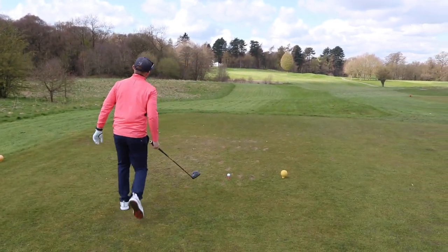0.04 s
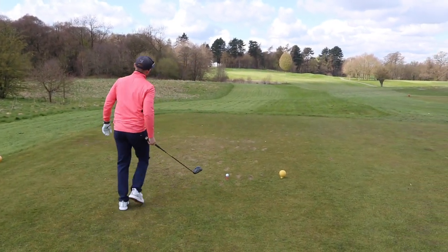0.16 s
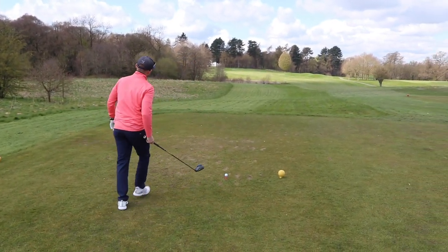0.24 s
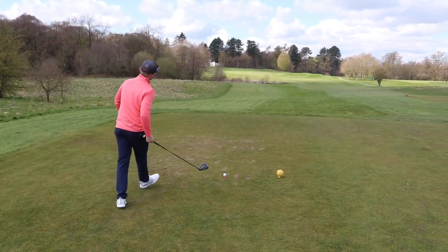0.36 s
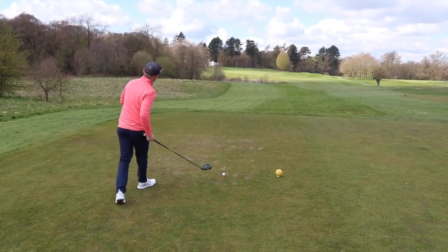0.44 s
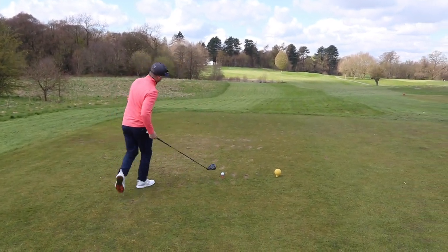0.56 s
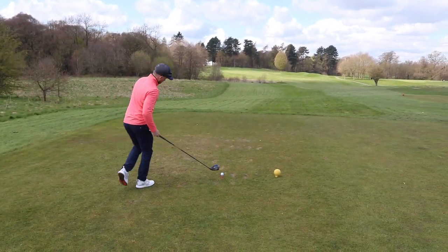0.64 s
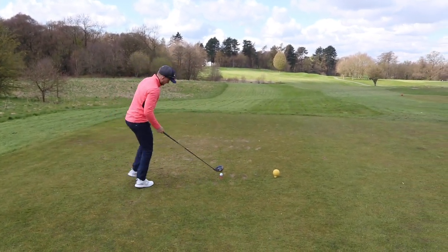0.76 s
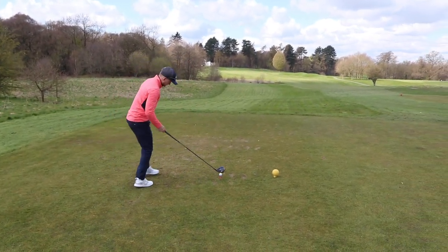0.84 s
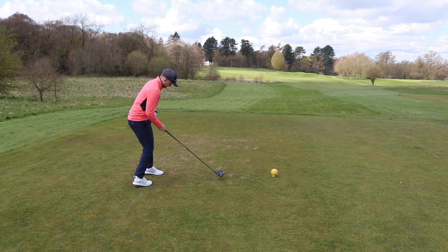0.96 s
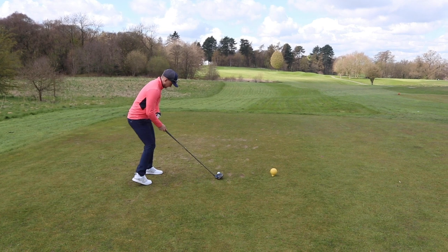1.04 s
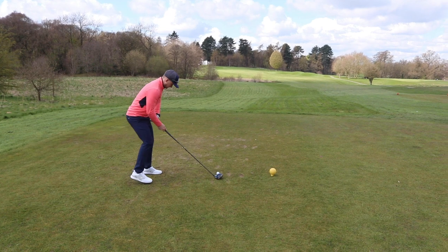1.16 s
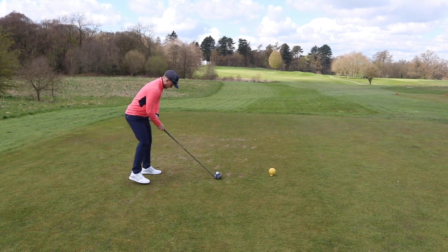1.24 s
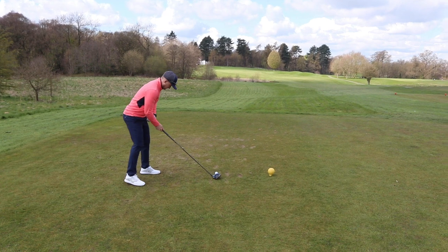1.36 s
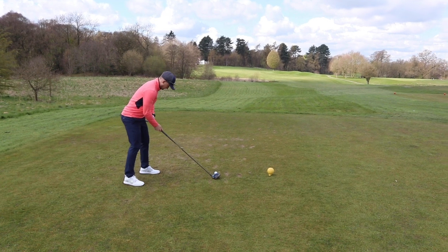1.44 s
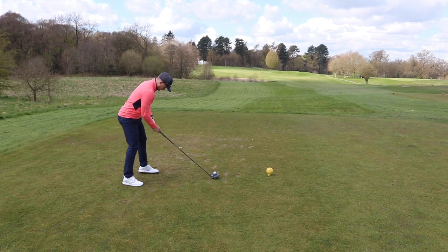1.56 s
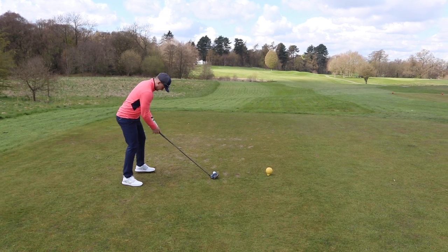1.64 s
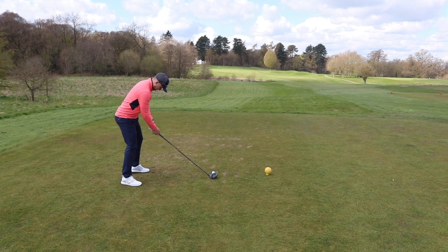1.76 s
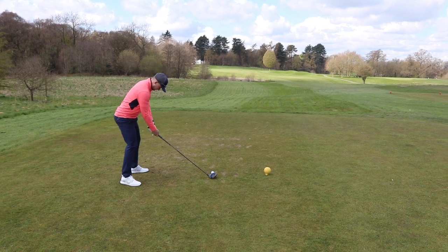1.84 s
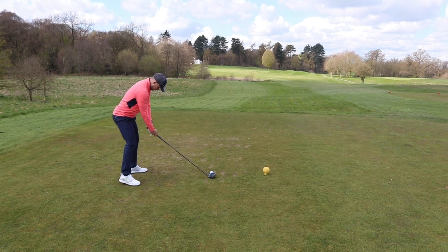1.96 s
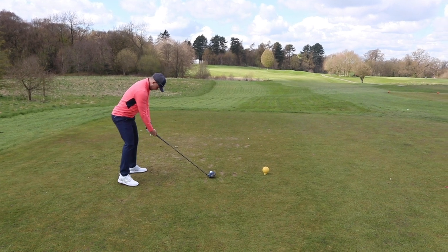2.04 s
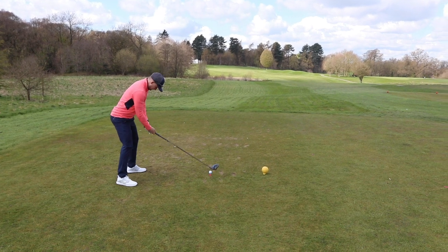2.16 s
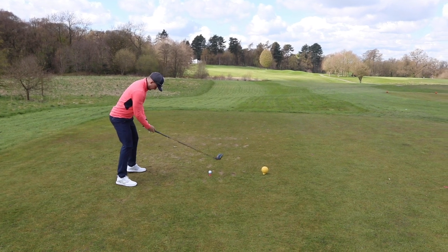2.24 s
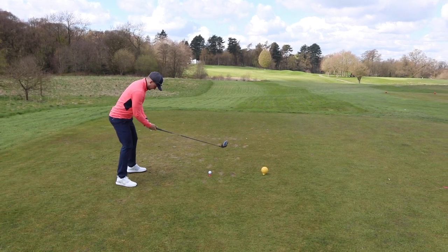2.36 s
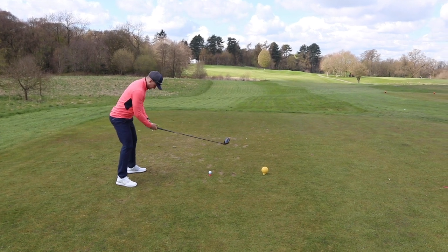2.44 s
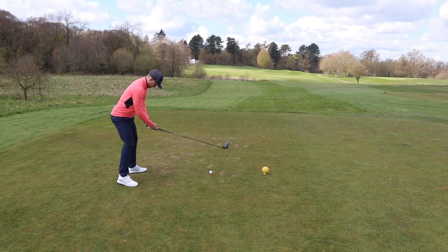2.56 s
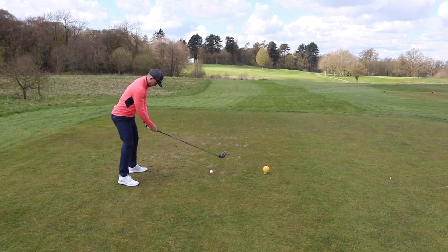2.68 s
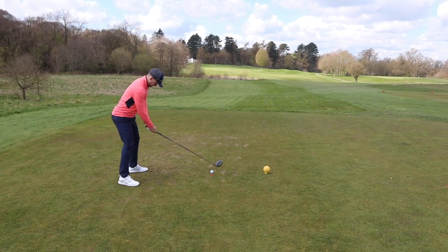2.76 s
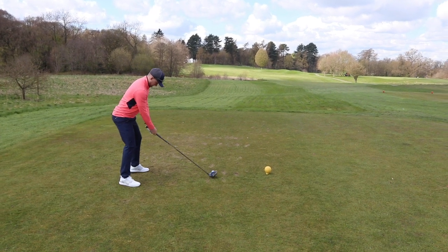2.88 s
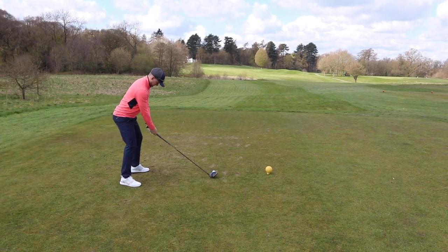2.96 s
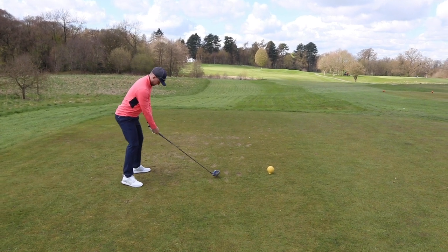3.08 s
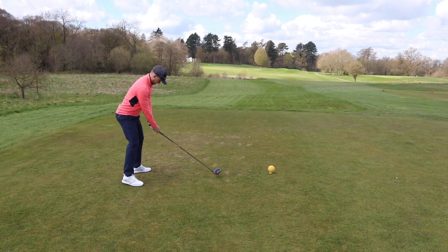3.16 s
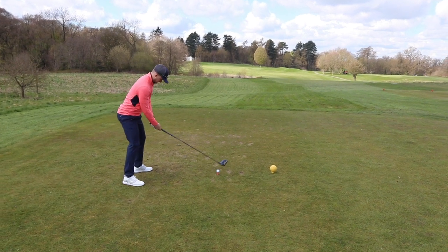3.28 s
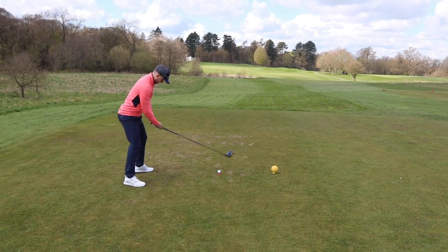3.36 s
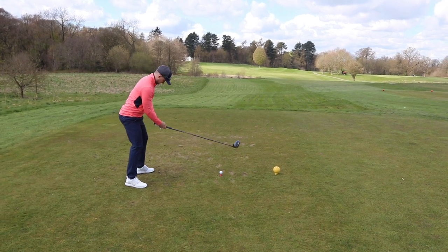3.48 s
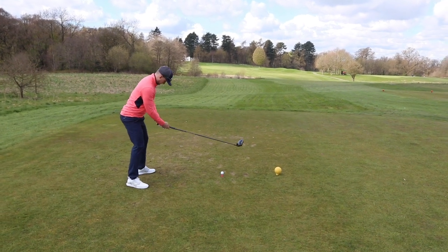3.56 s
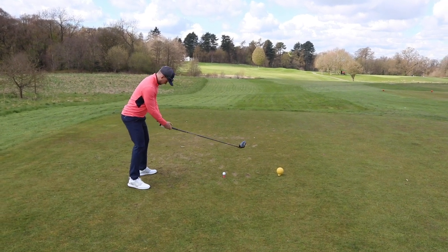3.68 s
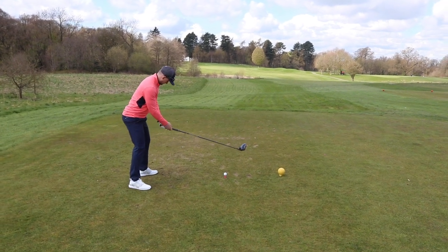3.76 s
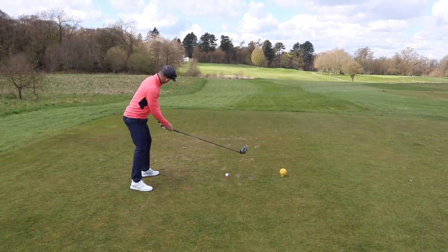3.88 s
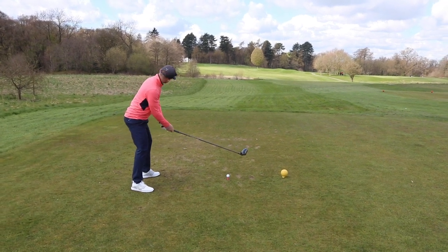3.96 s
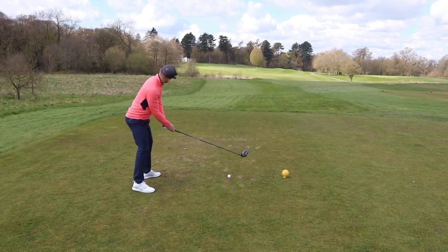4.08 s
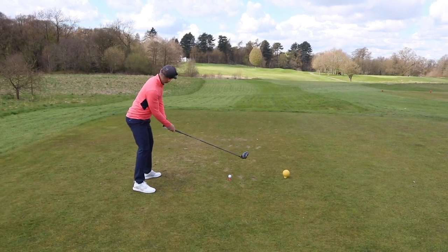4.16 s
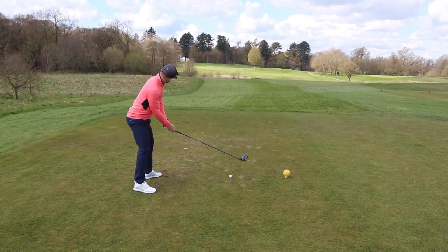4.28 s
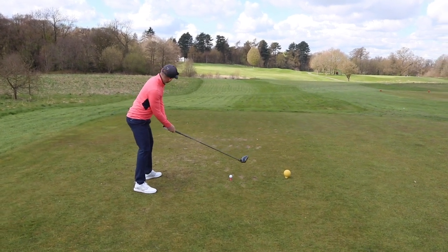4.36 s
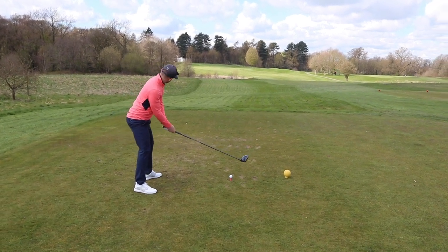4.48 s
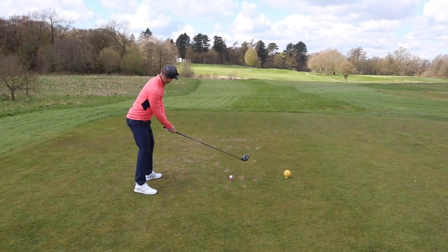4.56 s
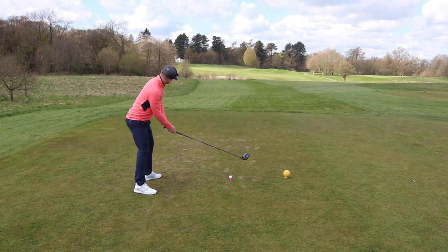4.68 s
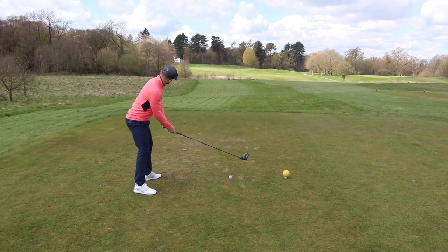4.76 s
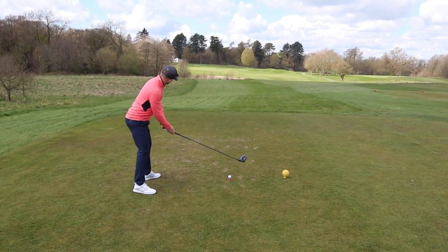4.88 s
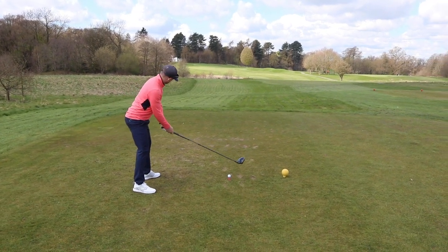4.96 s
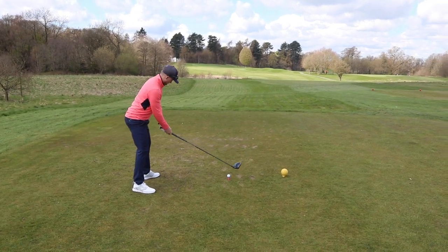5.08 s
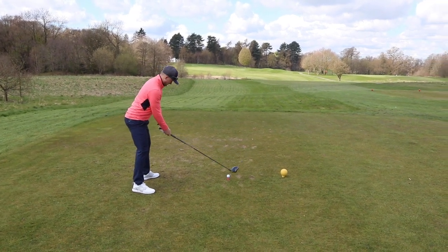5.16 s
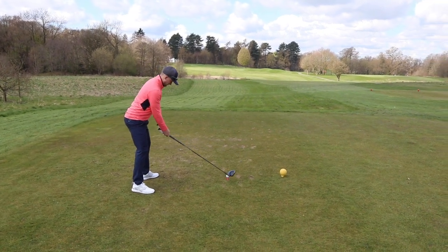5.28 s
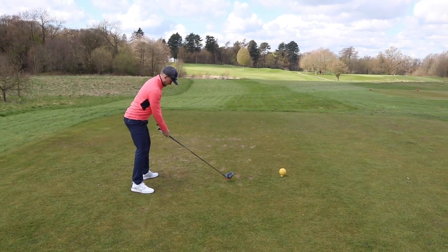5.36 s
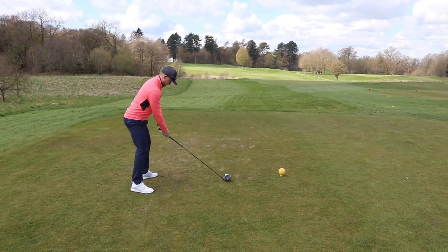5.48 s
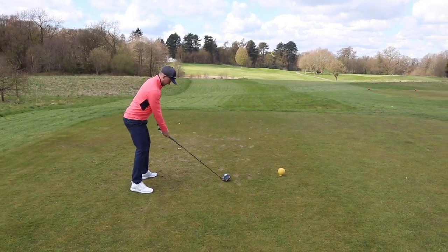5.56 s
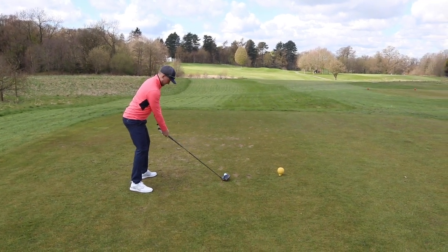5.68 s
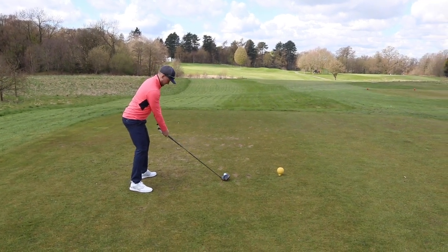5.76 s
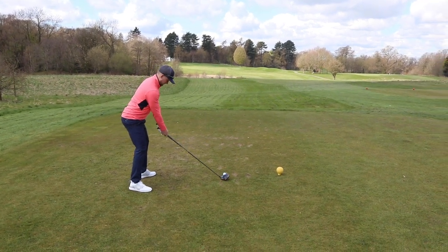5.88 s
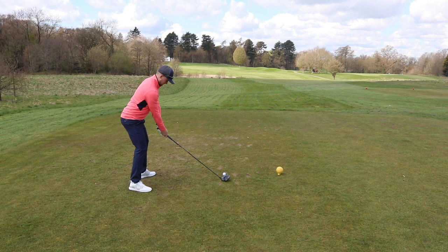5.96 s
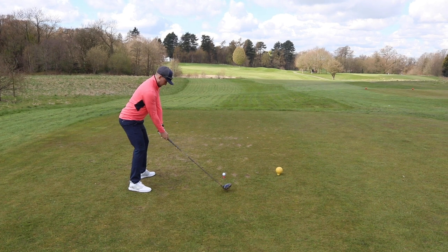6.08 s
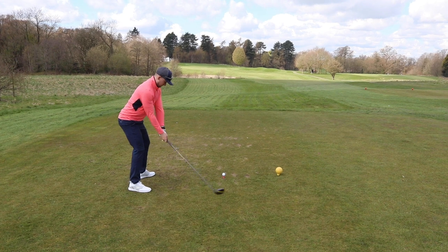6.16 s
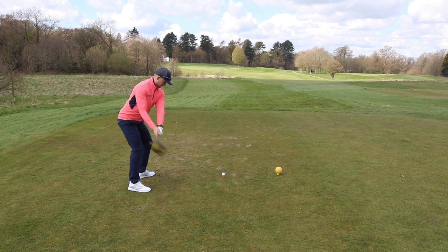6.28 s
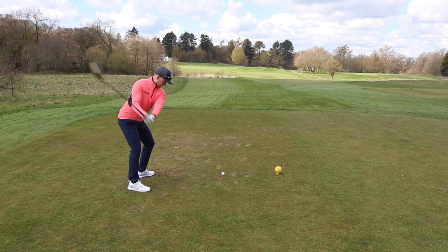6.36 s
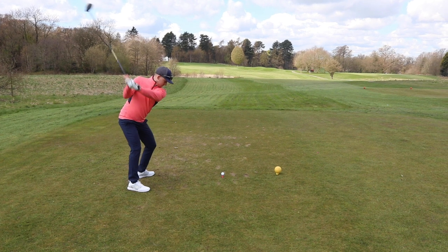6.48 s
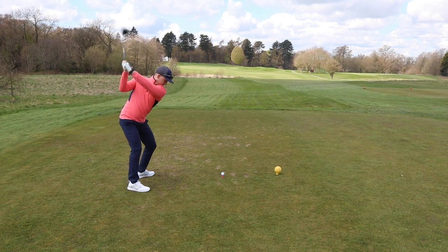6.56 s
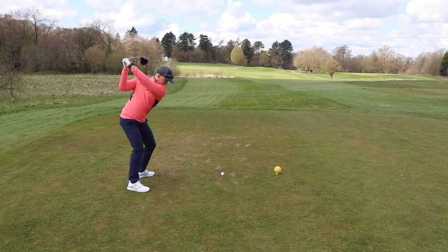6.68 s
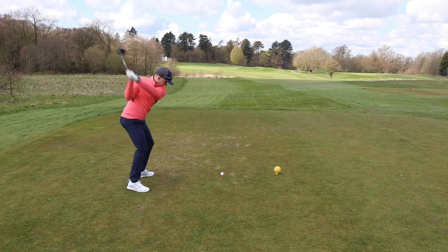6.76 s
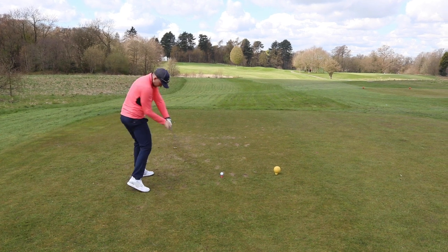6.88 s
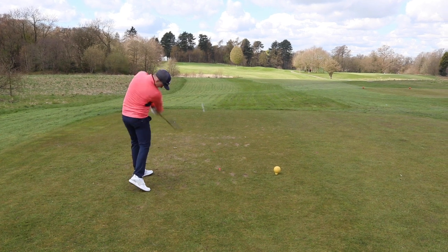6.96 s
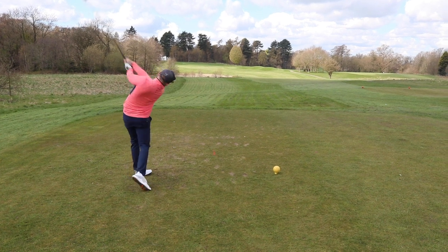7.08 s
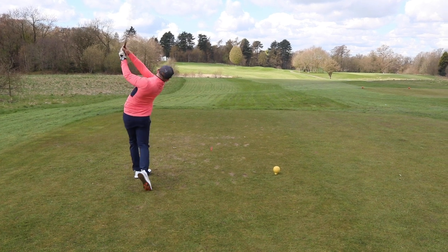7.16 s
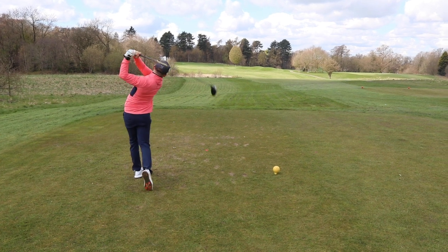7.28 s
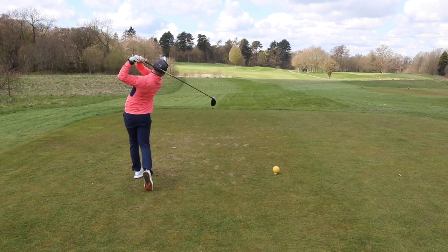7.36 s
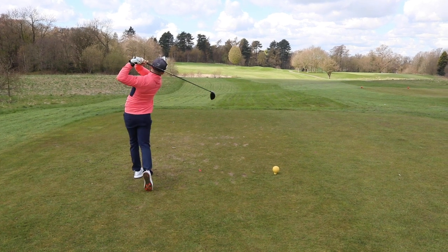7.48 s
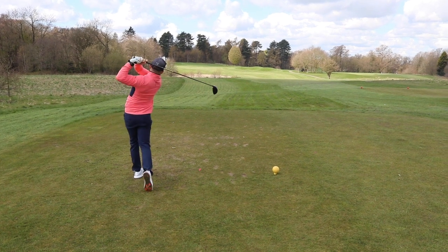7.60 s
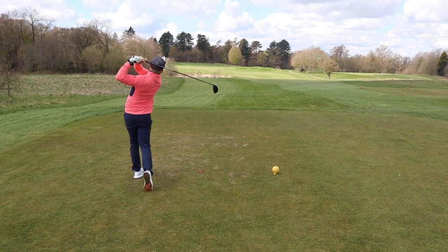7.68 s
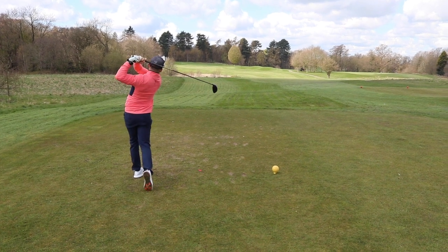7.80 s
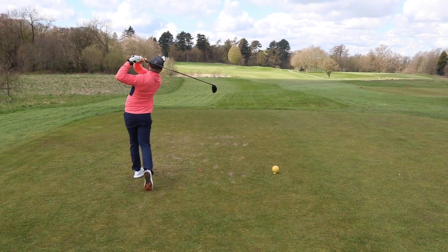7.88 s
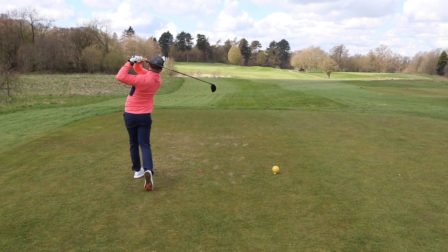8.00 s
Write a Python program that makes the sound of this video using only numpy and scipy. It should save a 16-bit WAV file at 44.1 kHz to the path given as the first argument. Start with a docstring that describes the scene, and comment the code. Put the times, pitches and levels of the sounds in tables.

```python
"""Golf drive outdoors. Throughout: far traffic rumble, tyre roar, leaves and faint drones, all from shaped noise.
From 1.9 s the player's glove and jacket creak (slips exciting resonances); from 3.8 s a far small bird sings
(sine sweeps). Near 7 s the shaft whooshes down (noise and whistle following its speed), then the hollow metal
head cracks and rings, its pitch rising as it swings round; ground and trees answer with decaying noise bursts.
Preamp hiss lies under it all; gain control ducks the blow and the microphone clips."""
import sys
import numpy as np
from scipy import signal
from scipy.fft import rfft, irfft, next_fast_len
from scipy.io import wavfile
from scipy.ndimage import minimum_filter1d, map_coordinates

SR = 44100
rng = np.random.default_rng(int(sys.argv[2]) if len(sys.argv) > 2 else 0)


def pcm_store(signal):
    """Save signal as 16-bit PCM."""
    levels = np.round(np.clip(np.atleast_2d(signal), -1, 1) * 32767)
    wavfile.write(sys.argv[1], SR, levels.astype(np.int16).T)


def volts_from_decibels(level):
    """Turn decibel levels (scalar or array-like) into linear amplitude factors."""
    exponent = np.asarray(level, float) / 20
    return 10 ** exponent


N = 354211
T = np.arange(N) / SR
BLOW_S = 7.0681


def unit(x):
    """Scaled to rms 1."""
    return x / np.sqrt(np.mean(x ** 2) + 1e-20)


def curves(rows):
    """One value per sample for each column after the time."""
    time_s, *columns = np.transpose(rows)
    return [np.interp(T, time_s, column) for column in columns]


def wobble(rate_hz):
    """Smooth random curve, rate_hz knots a second."""
    knots = rng.standard_normal(int(N * rate_hz / SR) + 4)
    return map_coordinates(knots, [T * rate_hz])


def filtered(x, response):
    """x times a complex response of frequency."""
    size = next_fast_len(len(x) + 8192)
    hz = np.fft.rfftfreq(size, 1 / SR)
    return irfft(rfft(x, size) * response(hz), size)[:len(x)]


def noise(spectrum, size=N):
    """Noise of rms 1, spectrum interpolated over log frequency."""
    point_hz, point_db = np.transpose(spectrum)

    def response(hz):
        return volts_from_decibels(np.interp(np.log(hz + 1), np.log(point_hz + 1), point_db))

    return unit(filtered(rng.standard_normal(size), response))


def resonance(hz, centre_hz, width_hz):
    """Causal second-order band-pass response."""
    return 1j * hz * width_hz / (centre_hz ** 2 - hz ** 2 + 1j * hz * width_hz)


def add(track, start_s, sound):
    """Mixes a sound into the track at start_s."""
    part = track[round(start_s * SR):][:len(sound)]
    part += sound[:len(part)]


# mean background levels: (time [s], rumble level [dB], tyre roar level [dB], leaves level [dB])
FAR_LEVELS = [(0.0, -34.5, -46, -63), (0.4, -31.5, -47, -63), (0.7, -35.5, -48.5, -65.5),
              (1.1, -32, -48, -65), (1.7, -33.5, -47, -65), (2.1, -35, -50, -65.5),
              (3.05, -37, -49.5, -64.5), (3.4, -33, -50, -63), (3.9, -32.5, -50, -63),
              (4.5, -34, -50.5, -65), (5.05, -36.5, -51, -64), (5.8, -32, -51.5, -67.5),
              (6.6, -33.5, -49, -63), (7.5, -33, -48.5, -65.5), (8.0, -34.5, -48, -66.5)]
# noise spectra: (frequency [Hz], density [dB])
RUMBLE_SPECTRUM = [(8.8, -43), (15, -13.5), (48, 2), (91, 2), (112, -3.5), (140, -1.5), (166, -6),
                   (237, -14.5), (277, -14.5), (450, -27.5), (580, -61.5), (990, -120)]
ROAR_SPECTRUM = [(180, -31), (300, -6.5), (481, -4.5), (567, -6), (667, -5.5), (728, -5), (786, -2.5),
                 (849, -6), (917, -3.5), (1540, -6.5), (1720, -9), (2340, -12.5), (3000, -32), (3900, -62),
                 (6600, -120)]
LEAVES_SPECTRUM = [(1530, -25.5), (2600, -1.5), (3250, -6.5), (4170, -7), (5230, -17.5), (6000, -21.5),
                   (7800, -45), (13200, -120)]
# steady narrow bands: (frequency [Hz], width [Hz], level [dB rms])
DRONE_BANDS = [(138.6, 9.7, -44.5), (809.7, 22, -62)]


def background():
    """Traffic rumble in lumps, tyre roar and leaves as wavering noise; drones as resonated noise."""
    rumble_db, roar_db, leaves_db = curves(FAR_LEVELS)
    rumble_db = rumble_db + 1.1 * wobble(7) + 0.83 * wobble(16)
    roar_db = roar_db + 0.77 * wobble(5)
    leaves_db = leaves_db + 0.8 * wobble(6)
    out = volts_from_decibels(rumble_db) * noise(RUMBLE_SPECTRUM)
    out += volts_from_decibels(roar_db) * noise(ROAR_SPECTRUM)
    out += volts_from_decibels(leaves_db) * noise(LEAVES_SPECTRUM)
    for centre_hz, width_hz, level_db in DRONE_BANDS:
        drone = filtered(rng.standard_normal(N), lambda hz: resonance(hz, centre_hz, width_hz) ** 2)
        out += volts_from_decibels(level_db) * unit(drone)
    return out


# single notes: (time [s], length [s], start pitch [Hz], end pitch [Hz], level [dB rms])
BIRD_NOTES = [(3.847, .1, 5250, 4700, -71), (4.04, .1, 6750, 6850, -83), (5.41, .09, 7000, 7080, -81)]
# see-saw song: a falling note follows each rising one
SONG_S, PAIR_S, ANSWER_S = 4.307, 0.1702, 0.08  # first note, pair spacing, rise-to-fall delay
RISING, FALLING = (0.032, 4900, 5700), (0.031, 6200, 4750)  # (length [s], start pitch [Hz], end pitch [Hz])
PAIR_DB, SCATTER_DB = (-75, -77, -73, -69.5, -72.5, -72), 0.8  # mean per pair, random spread per note


def bird():
    """Sine sweeps, quickest at the high end, fluttering in the moving air."""
    out = np.zeros(N)
    notes = list(BIRD_NOTES)
    for k, pair_db in enumerate(PAIR_DB):
        for j, shape in enumerate((RISING, FALLING)):
            level_db = pair_db + SCATTER_DB * rng.standard_normal()
            notes.append((SONG_S + PAIR_S * k + ANSWER_S * j, *shape, level_db))
    for start_s, length_s, start_hz, end_hz, level_db in notes:
        u = np.arange(int(length_s * SR)) / (length_s * SR)
        height = u if end_hz > start_hz else 1 - u
        pitch_hz = min(start_hz, end_hz) + abs(end_hz - start_hz) * height ** 1.5
        tone = np.sin(2 * np.pi * np.cumsum(pitch_hz) / SR)
        swell = np.sin(np.pi * u) ** 0.8 * (1 - 0.5 * height)
        flutter = volts_from_decibels(2.5 * wobble(150)[:len(u)])
        add(out, start_s, volts_from_decibels(level_db) * unit(swell * flutter * tone))
    return out


# leather resonances: (frequency [Hz], width [Hz], gain [dB])
LEATHER_MODES = [(1320, 120, 9), (1590, 110, 10), (2150, 200, 1), (2500, 220, 1), (2910, 240, -0.5),
                 (4000, 280, -1.5), (4400, 350, -2), (4780, 250, -1.5), (5430, 350, -8)]


def leather(hz, colour_hz, spread_oct):
    """Response of the leather modes, weighted towards colour_hz, signs alternating."""
    total = 0
    for k, (centre_hz, width_hz, gain_db) in enumerate(LEATHER_MODES):
        weight = np.exp(-(np.log2(centre_hz / colour_hz) / spread_oct) ** 2)
        total = total + (-1) ** k * volts_from_decibels(gain_db) * weight * resonance(hz, centre_hz, width_hz)
    return total


# glove and jacket: (time [s], level [dB], length [s], colour centre [Hz], colour spread [octaves])
CREAK_EVENTS = [(1.94, -50.5, 0.072, 1490, 0.22), (2.629, -55.5, .025, 2150, .15),
                (2.889, -50.5, 0.025, 2600, 1.4), (3.028, -50, 0.026, 1320, .15),
                (3.064, -52, .03, 2200, 0.83), (3.588, -49, 0.08, 1600, 0.22),
                (3.775, -55, 0.014, 3100, 0.53), (3.841, -51, 0.011, 2900, .5),
                (4.003, -58.5, 0.01, 3900, 0.95), (4.076, -57, .012, 3100, .35),
                (4.197, -59, .012, 3800, .7), (4.268, -64, .01, 4750, .3),
                (4.434, -51.5, 0.021, 2690, 0.68), (6.679, -43.5, 0.029, 2000, 1.26),
                (6.716, -42, 0.022, 1900, 1.6), (6.749, -49.5, 0.026, 1900, 0.75)]


def creaks():
    """Clumps of uneven stick-slip releases stir the leather resonances near each colour centre."""
    out = np.zeros(N)
    t = np.arange(SR // 4) / SR
    for start_s, level_db, length_s, colour_hz, spread_oct in CREAK_EVENTS:
        slips = rng.standard_normal(len(t)) * (rng.random(len(t)) < 0.14)
        slips[0] = 4.0  # strong first release
        stroke = np.clip(0.51 + t / 0.003, 0, 1) * np.exp(-(t / length_s) ** 2)

        def response(hz):
            return leather(hz, colour_hz, spread_oct) * resonance(hz, colour_hz, 3.5 * colour_hz)

        creak = unit(filtered(slips * stroke, response))
        # level refers to the creak's length, not the whole buffer
        add(out, start_s, volts_from_decibels(level_db) * creak * np.sqrt(length_s / t[-1]))
    return out


# echoes of the blow: (delay [s], level [dB], t60 [s])
ECHO_BURSTS = [(.006, -21.5, .075), (.03, -41.5, 0.26), (.133, -43, 0.084), (.155, -37, 0.054),
               (.17, -44, .06), (.18, -56, 1)]
# echo noise spectrum: (frequency [Hz], density [dB])
TREES_SPECTRUM = [(880, -38), (1500, -10), (2090, -5.5), (2260, -10.5), (3020, -4), (3660, -4), (4470, -2),
                  (5460, -12.5), (11000, -34.5), (14300, -68.5), (22000, -120)]


def echoes():
    """Ground, bank and trunks scatter the crack back as decaying noise bursts."""
    out = np.zeros(N)
    t = np.arange(SR) / SR
    onset = 1 - np.exp(-t / 0.003)
    for delay_s, level_db, t60_s in ECHO_BURSTS:
        decay = volts_from_decibels(level_db - 60 * t / t60_s)
        add(out, BLOW_S + delay_s, decay * onset * noise(TREES_SPECTRUM, size=SR))
    return out


# rush noise spectrum: (frequency [Hz], density [dB])
SWISH_SPECTRUM = [(150, -42), (250, -12), (371, 2), (1020, -14.5), (1170, -9), (2530, -20.5), (3560, -24),
                  (3880, -24.5), (4370, -22.5), (5550, -31), (15000, -47)]
FASTEST_S, GAIN_S, LOSE_S, ROUNDNESS = 7.058, 0.225, 0.5, 1.35  # shaft speed peak, rise, fall, exponent
WHISTLE_HZ, RUSH_DB, WHISTLE_DB = 945, -27.5, -33.5  # at full speed
RUSH_POWER, WHISTLE_POWER = 9.5, 11.5  # amplitude exponents of speed
RUSH_PAST_DB, WHISTLE_PAST_DB, PAST_S = 11, 25, 0.016  # loss as the shaft turns away, time constant


def swing():
    """Broad rush plus breathy vortex whistle and octave; whistle pitch is proportional to shaft speed."""
    span_s = np.where(T < FASTEST_S, GAIN_S, LOSE_S)
    speed = np.exp(-(np.abs(T - FASTEST_S) / span_s) ** ROUNDNESS)
    past = 1 - np.exp(-np.clip(T - FASTEST_S, 0, None) / PAST_S)
    phase = 2 * np.pi * np.cumsum(WHISTLE_HZ * speed) / SR
    whistle = (0.22 + wobble(300)) * np.sin(phase)
    whistle += 0.25 * wobble(420) * np.sin(2 * phase)
    rush_gain = volts_from_decibels(RUSH_DB - RUSH_PAST_DB * past) * speed ** RUSH_POWER
    whistle_gain = volts_from_decibels(WHISTLE_DB - WHISTLE_PAST_DB * past) * speed ** WHISTLE_POWER
    return rush_gain * noise(SWISH_SPECTRUM) + whistle_gain * unit(whistle)


# head modes as heard at the blow: (frequency [Hz], level [dB], t60 [s])
HEAD_MODES = [(1600, -0.5, .02), (1797, -43, 1.2), (2280, -16.5, .02), (2760, 1.5, .05), (2890, -25.5, .24),
              (3080, -9, .05), (3340, -28, 0.25), (3600, 13, 0.044), (3795, -13, .05), (4054, 1.5, 0.04),
              (4330, 10.5, .025), (4883, 4.5, 0.027), (5476, 3, 0.025), (6500, -15, 0.04),
              (7680, -22.5, 0.039), (4280, -16.5, .06), (4670, -22.5, 0.066), (5700, -22.5, .05),
              (8680, -27.5, .04)]
# crack noise spectrum: (frequency [Hz], density [dB])
CRACK_SPECTRUM = [(150, -36.5), (350, -3.5), (1000, -8.5), (2000, -10), (5000, 6.5), (9000, -13.5),
                  (16000, -20)]
AWAY_M_S, LAST_M_S, TURN_S, SOUND_M_S = 46, -4, 0.071, 343  # head recedes, turns, drifts back
HIDDEN_S, HIDE_DB_PER_S = 0.157, 700  # after the blow: player's body hides the head


def strike():
    """The squashed ball gives one push and a crack; head modes ring, Doppler-shifted as the head turns."""
    t = np.clip(T - BLOW_S, 0, None)
    struck = t > 0
    away_m_s = LAST_M_S + (AWAY_M_S - LAST_M_S) * np.exp(-(t / TURN_S) ** 2)
    doppler = (SOUND_M_S + AWAY_M_S) / (SOUND_M_S + away_m_s)  # relative to the blow
    heard_s = np.cumsum(doppler * struck) / SR
    flutter_db = 4.2 * np.clip(t / 0.046, 0, 1)  # the face sweeps its beams past the microphone
    ring = np.zeros(N)
    for mode_hz, level_db, t60_s in HEAD_MODES:
        envelope = volts_from_decibels(level_db + flutter_db * wobble(170) - 60 * t / t60_s)
        ring += envelope * np.sin(2 * np.pi * mode_hz * heard_s)
    ring *= volts_from_decibels(-HIDE_DB_PER_S * np.clip(t - HIDDEN_S, 0, None))
    ring *= 1 - np.exp(-t / 0.00095)
    u = t / 0.00018
    push = volts_from_decibels(13.0) * u * (2 - u) * np.exp(-u)
    crack = volts_from_decibels(0.5 - 60 * t / 0.024) * noise(CRACK_SPECTRUM) * struck
    return ring + push + crack


def scene():
    """Sum of all sources at the microphone, one channel."""
    return (background() + bird() + creaks() + echoes() + swing() + strike())[None]


# preamp noise spectrum: (frequency [Hz], density [dB])
HISS_SPECTRUM = [(2940, -34), (5000, 0.5), (5330, -6), (6160, -2), (15100, -3), (16000, -27)]


def preamp_hiss():
    """Steady electronic noise, mostly treble."""
    return volts_from_decibels(-71.0) * noise(HISS_SPECTRUM)


def ducked(x, knee_db, slope, hold_s, attack_s, release_s):
    """Gain control: turns down after a peak, holds, then lets go."""
    level_db = 20 * np.log10(np.abs(x) + 1e-9)
    want_db = -slope * np.clip(level_db - knee_db, 0, None)
    hold = int(hold_s * SR)
    held_db = minimum_filter1d(want_db, hold, origin=(hold - 1) // 2)  # window reaches back

    def lagged(gain_db, lag_s):
        step = 1 / (lag_s * SR)
        return signal.lfilter([step], [1, step - 1], gain_db)

    attacked_db = lagged(held_db, attack_s)
    gain_db = np.minimum(attacked_db, lagged(attacked_db, release_s))
    return x * volts_from_decibels(gain_db)


def band_limit(x):
    """A steep low-pass at the top of the band."""
    return signal.sosfilt(signal.butter(12, 21850, fs=SR, output="sos"), x)


def record(dry):
    """Preamp hiss, gain control, clipping with a tight knee, treble cut."""
    x = dry[0] + preamp_hiss()
    x = ducked(x, knee_db=-2.0, slope=0.55, hold_s=0.068, attack_s=0.013, release_s=0.023)
    clipped = x / (1 + np.abs(x / 0.99) ** 12) ** (1 / 12)
    mix = filtered(clipped, lambda hz: np.where(hz < 15750, 1, volts_from_decibels(-16)))
    return band_limit(mix[None])


dry = scene()
out = record(dry)
pcm_store(out)
```